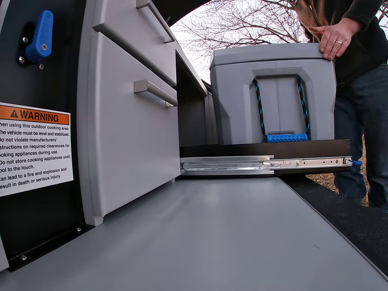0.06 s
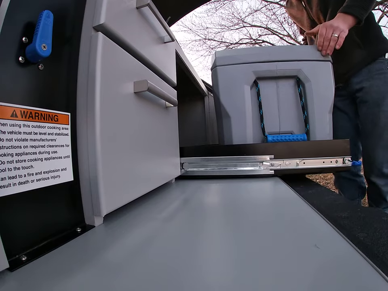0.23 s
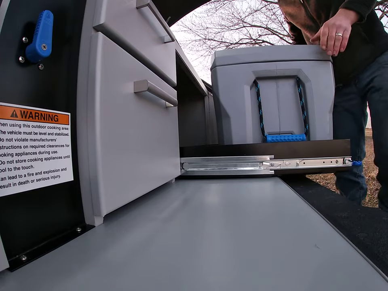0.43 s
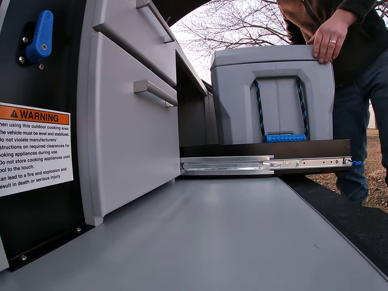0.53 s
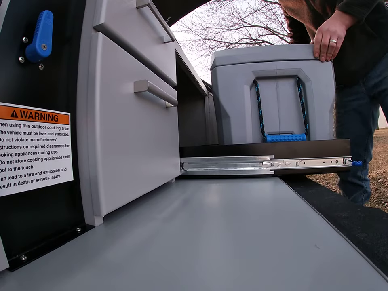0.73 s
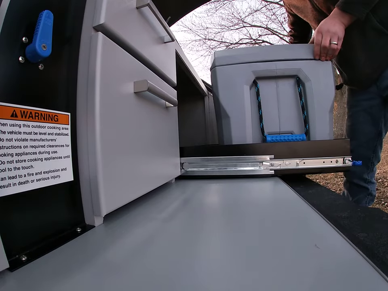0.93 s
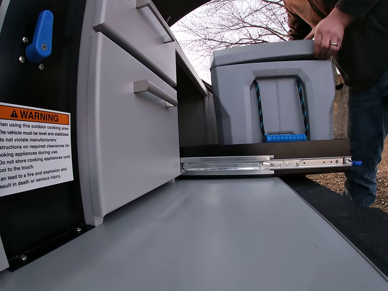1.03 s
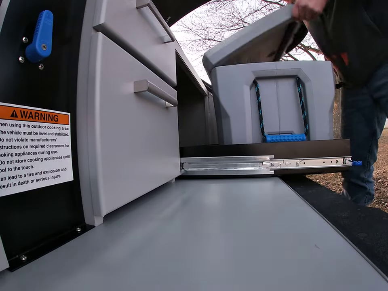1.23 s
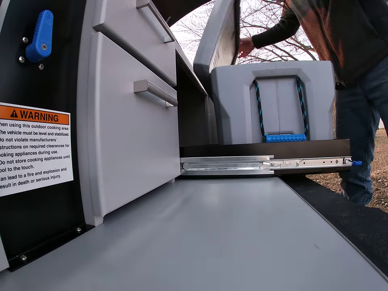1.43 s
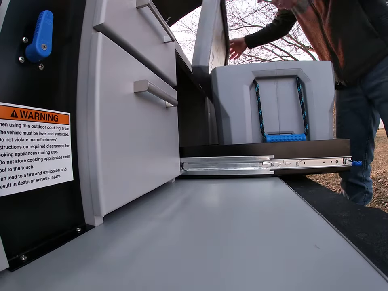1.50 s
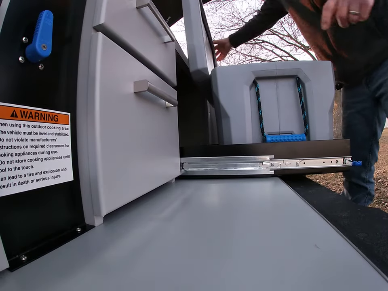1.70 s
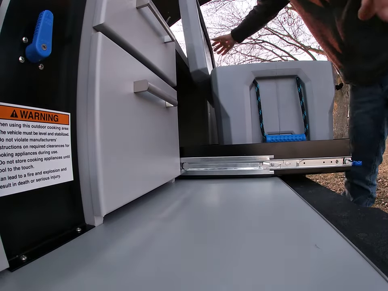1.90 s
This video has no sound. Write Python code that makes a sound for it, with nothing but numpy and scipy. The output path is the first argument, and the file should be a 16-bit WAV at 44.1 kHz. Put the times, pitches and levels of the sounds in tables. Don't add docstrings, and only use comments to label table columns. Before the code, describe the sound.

A plastic cool box is unlatched with a quick rubbery snap and a burst of loud hollow knocks, then lighter bumps as its lid lifts, over faint low breeze hum outdoors, heard close from the trailer body.

```python
import sys
import numpy as np
from scipy import signal
from scipy.fft import rfft, irfft, next_fast_len
from scipy.io import wavfile
from scipy.ndimage import uniform_filter1d, map_coordinates

SR = 44100
rng = np.random.default_rng(int(sys.argv[2]) if len(sys.argv) > 2 else 0)


def field_ratio(decibels):
    return 10 ** (np.asarray(decibels, dtype=float) / 20)


def generate_wav(signal):
    frames = np.transpose(np.atleast_2d(signal))
    scaled = np.clip(frames, -1, 1) * 32767
    pcm = np.round(scaled).astype(np.int16)
    wavfile.write(sys.argv[1], SR, pcm)


N = 85995
T = np.arange(N) / SR

# t/s, level/dB
BREEZE_LEVEL = [(0, 0.5), (.1, -2.5), (.2, 3.5), (.7, 0.5), (.8, -2.5), (.86, 6), (1.4, 0), (1.6, -0.5),
                (1.75, -1), (1.85, 0.5), (1.95, 0.5)]
# f/Hz, density/dB per Hz
HUM_SPECTRUM = [(15, -17), (25, 8.5), (226, -2.5), (384, -15.5), (534, -15), (575, -12.5), (800, -14.5),
                (2000, -38.5), (2600, -90), (4400, -120)]
# f/Hz, width/Hz, level/dB
HUM_RESONANCES = [(55, 38, 2), (203.7, 11, 11.5), (535, 9.4, 13.5)]
# f/Hz, density/dB per Hz
AIR_SPECTRUM = [(880, -44), (1500, -5), (3000, -2), (5270, -4), (8500, -3.5), (9200, -20), (12000, -22.5),
                (13500, -43)]
# t/s, level/dB, panel mode f/Hz, t60/s
SHOVE_EVENTS = [(.125, -30, 60.4, 0.13), (0.227, -21.5, 185, 0.27), (.23, -19.5, 60.9, 0.66),
                (.235, -22, 153.6, .3), (.24, -30, 286, 0.18), (0.301, -16, 181, 0.75),
                (0.321, -8, 68.2, 0.24), (.365, -7.5, 187.4, 0.26), (.405, -12, 165.1, 0.43),
                (0.421, -14.5, 111.7, 0.45), (.46, -16.5, 57.7, 0.57), (.52, -13.5, 182.6, 0.19),
                (0.581, -23, 162.5, 0.17), (0.621, -18, 169.7, 0.097), (0.659, -26.5, 170.7, 0.27),
                (0.719, -26.5, 78.6, 0.15), (0.834, -25.5, 170.6, 0.094), (0.909, -15.5, 178, 0.17),
                (.9146, -21, 180.7, 0.32), (.92, -16, 55, 0.38), (.935, -24, 168, 0.17),
                (.93, -35, 269, 0.16), (.982, -26.5, 157.6, 0.24), (.95, -23, 161.3, 0.6),
                (.97, -16, 79, 0.14), (1.112, -10, 46, 0.094), (1.195, -13, 181.4, 0.14),
                (1.2005, -16.5, 178, 0.14), (1.22, -18.5, 60.7, 0.15), (1.228, -29, 266, 0.12),
                (1.244, -21, 205, 0.14), (1.277, -17.5, 74.5, 0.17), (1.33, -31.5, 190.5, 0.81)]
# peak t/s, rise/s, fall/s, level/dB, brightness/dB per octave
RUSTLE_EVENTS = [(0.13, 0.016, 0.033, -52.5, -1), (0.2, 0.03, 0.16, -48.5, -5.5),
                 (0.81, 0.062, 0.049, -52.5, -5), (1.124, 0.028, 0.027, -42, -7.5),
                 (1.177, 0.015, 0.024, -53.5, 2), (1.119, .005, 0.0067, -58.5, 8),
                 (1.245, 0.01, .02, -54, -1.5), (1.282, 0.025, 0.04, -56.5, -1), (1.54, .02, 0.02, -59, -3),
                 (1.4, 0.016, 0.026, -56.5, -6), (1.1, 0.0089, .015, -54.5, -0.5),
                 (1.473, 0.028, 0.049, -51.5, -1.5), (1.95, 0.079, .05, -56, -3),
                 (0.784, 0.0078, 0.015, -52.5, -1.5), (0.654, 0.041, 0.037, -64.5, -3)]
# f/Hz, density/dB per Hz
CLOTH_SPECTRUM = [(500, -28.5), (1200, -9.5), (2200, -12), (3300, -9), (4860, -8), (8500, -10),
                  (12000, -25), (15400, -42)]
# t/s, level/dB, brightness/dB per octave, ring time factor, contact/s
KNOCK_EVENTS = [(0.227, -40.5, 6, 0.46, 0.0082), (0.254, -33.5, 4, 1, 0.013), (0.265, -24, -2, 0.92, 0.059),
                (.307, -23, 2.5, 0.47, 0.0032), (0.3133, -16.5, 0, 1, .005),
                (0.346, -27, 2.5, 0.71, 0.0073), (.3914, -26.5, 0, .2, .002),
                (0.3925, -17.5, -2, 0.74, 0.01), (.44, -24, -4, 0.66, 0.018),
                (0.61, -53.5, -1.5, 0.84, .004), (0.646, -51.5, 6, 0.2, 0.0078),
                (0.7043, -46.5, -3, 1, 0.0065), (.873, -57, 4, .15, .002), (.891, -28, -3, 1, 0.006),
                (0.908, -22.5, -7, 0.92, 0.0021), (.946, -30.5, -1, 0.93, 0.0046),
                (.965, -33.5, -4, 0.99, 0.024), (1.11, -42, -2, .5, 0.018), (1.149, -38.5, 2, 1, 0.021),
                (1.182, -31.5, -5.5, 0.49, 0.021), (1.234, -31.5, -5.5, 0.58, 0.006),
                (1.26, -37, -4, 0.71, 0.0071), (1.295, -42, -4, 0.89, 0.025),
                (1.3511, -39.5, -2.5, 0.27, 0.017), (1.605, -60, 6, 0.12, 0.0046),
                (1.612, -51.5, -6.5, 0.92, 0.0039), (1.912, -38.5, -6, 0.95, .04)]
# f/Hz, density/dB per Hz
BLOW_SPECTRUM = [(150, -0.5), (250, -7.5), (353, -17), (1050, -16.5), (2310, -20.5), (3560, -24),
                 (8560, -41), (13500, -62), (15400, -100)]
# f/Hz, width/Hz, level/dB
PANEL_RESONANCES = [(415, 10.7, 15.5), (535, 109, 11.5), (618, 41, 12.5), (797, 32, 9.5), (1050, 98, 7),
                    (1430, 11.5, 11), (2086, 74, 1.5), (3550, 290, -20.5), (6300, 1100, 1)]
# f/Hz, t60/s
PANEL_T60 = [(250, 0.6), (700, 0.34), (1840, 0.21), (4850, 0.21), (12000, 0.22)]
# t/s, level/dB, part's mode f/Hz, t60/s
CLACK_EVENTS = [(.227, -37, 2320, .05), (.228, -29.5, 397, 0.38), (.258, -25, 535, 0.4),
                (.2605, -18, 1498, 0.063), (.297, -14, 543.6, 0.11), (.307, -26, 3830, 0.059),
                (.309, -14.5, 1052, 0.23), (.3126, -18.5, 1202, .09), (.3126, -19, 2770, 0.062),
                (.312, -16, 3494, 0.058), (.312, -20, 3970, .04), (.326, -27, 3550, 0.12),
                (.313, -19, 6300, 0.025), (.315, -17.5, 395.5, 0.48), (.312, -19.5, 1430, 0.097),
                (.3914, -24, 2920, .03), (.392, -30.5, 2090, 0.092), (.393, -25, 1042, 0.1),
                (.393, -22, 539, .2), (.395, -26, 652, 0.15), (.405, -26, 803, 0.13),
                (.443, -22, 387, 0.21), (.447, -37, 1428, 0.23), (.8912, -38.5, 2910, 0.012),
                (.892, -30.5, 983, 0.097), (.892, -37, 1660, 0.12), (.893, -41, 2067, 0.08),
                (.893, -20, 451, 0.063), (.908, -25, 640, .06), (.946, -39.5, 3837, 0.038),
                (.946, -38.5, 3130, 0.043), (.947, -31.5, 650, 0.1), (.947, -41.5, 1010, 0.24),
                (.948, -39, 2019, 0.13), (1.12, -37.5, 1132, 0.05), (1.15, -33.5, 603, .3),
                (1.18, -38, 1488, 0.089), (1.19, -41, 580, 0.099), (1.2344, -40, 1530, 0.085),
                (1.25, -35.5, 592, 0.12), (1.265, -39, 1050, 0.12), (1.305, -38, 1050, 0.12),
                (1.3515, -43.5, 2375, 0.07), (1.352, -49, 2980, 0.031), (1.353, -52, 1650, 0.13),
                (1.355, -35.5, 603, 0.099), (1.608, -30, 607, 0.03), (1.615, -43.5, 1050, 0.11)]


def unit(x):
    return x / np.sqrt(np.mean(x ** 2) + 1e-20)


def along(points, hz):
    f, v = np.transpose(points)
    return np.interp(np.log(hz + 1), np.log(f + 1), v)


def peaks(modes, hz):
    power = 1
    for centre_hz, width_hz, db in modes:
        power = power + field_ratio(db) ** 2 / (1 + (2 * (hz - centre_hz) / width_hz) ** 2)
    return np.sqrt(power)


def wobble(rate_hz):
    knots = rng.standard_normal(int(N * rate_hz / SR) + 4)
    return map_coordinates(knots, [T * rate_hz])


def coloured(x, gain):
    m = next_fast_len(len(x) + 8192)
    hz = np.fft.rfftfreq(m, 1 / SR)
    return irfft(rfft(x, m) * gain(hz), m)[:len(x)]


def patchy(patchy_db):
    z = signal.stft(rng.standard_normal(N), nperseg=256)[2]
    field = uniform_filter1d(rng.standard_normal(z.shape), size=4, axis=0)
    field = uniform_filter1d(field, size=6, axis=1)
    return signal.istft(z * field_ratio(patchy_db * unit(field)), nperseg=256)[1][:N]


def rings(rows, rise_cycles, waver_rad):
    s, db, hz, t60_s = np.transpose(rows)[:, :, None]
    t = np.maximum(T - s, 0)
    drift = waver_rad * np.array([wobble(row[2] / 7) for row in rows])
    rise = (1 - np.exp(-t * hz / rise_cycles)) ** 2
    return (field_ratio(db - 60 * t / t60_s) * rise * np.sin(2 * np.pi * hz * t + drift)).sum(axis=0)


def body_hum():
    hum_db = -37.5
    level_db = hum_db + np.interp(T, *np.transpose(BREEZE_LEVEL)) + 0.45 * wobble(6.6)
    hum = coloured(patchy(patchy_db=2.0), lambda hz: field_ratio(along(HUM_SPECTRUM, hz)) * peaks(HUM_RESONANCES, hz))
    return unit(hum) * field_ratio(level_db)


def air_hiss(near):
    air_db = -67.5
    duck_from_db, duck_ratio, duck_release_s = -36, .5, .09
    air = unit(coloured(rng.standard_normal(N), lambda hz: field_ratio(along(AIR_SPECTRUM, hz))))
    k = np.exp(-1 / (duck_release_s * SR))
    loud_db = 10 * np.log10(signal.lfilter([1 - k], [1, -k], near ** 2) + 1e-12)
    duck_db = duck_ratio * np.maximum(loud_db - duck_from_db, 0)
    return air * field_ratio(air_db - duck_db)


def shoves():
    return rings(SHOVE_EVENTS, rise_cycles=0.4, waver_rad=0.49)


def sleeves():
    stroke_edge = 2.15
    out = np.zeros(N)
    for s, rise_s, fall_s, db, tilt_db in RUSTLE_EVENTS:
        grains = patchy(patchy_db=1.8) * field_ratio(0.83 * wobble(380))
        cloth = unit(coloured(
            grains, lambda hz: field_ratio(along(CLOTH_SPECTRUM, hz) + tilt_db * np.log2((hz + 50) / 4000))))
        side_s = np.where(T < s, rise_s, fall_s)
        stroke = np.exp(-.5 * np.abs((T - s) / side_s) ** stroke_edge)
        out += field_ratio(db) * stroke * cloth
    return out


def knock_gain(hz, tilt_db):
    floor_hz = 180
    dull_hz, dull_db_per_octave = 11500, 1.5
    corner_hz = dull_hz * 2 ** (tilt_db / dull_db_per_octave)
    db = along(BLOW_SPECTRUM, hz) + tilt_db * np.log2((hz + 50) / 1000)
    db = db + min(tilt_db, 0) * np.log2(1 + (hz / corner_hz) ** 4)
    low_cut = hz ** 4 / (hz ** 4 + floor_hz ** 4)
    return field_ratio(db) * peaks(PANEL_RESONANCES, hz) * low_cut


def knocks():
    crack_db, crack_t60_s, rise_s = 7, .007, 0.0003
    out, n = np.zeros(N + SR), SR // 2
    t = np.arange(n) / SR
    for s, db, tilt_db, ring, contact_s in KNOCK_EVENTS:
        noise = unit(coloured(rng.standard_normal(n), lambda hz: knock_gain(hz, tilt_db)))
        hz, u, z = signal.stft(noise, SR, nperseg=256, noverlap=224)
        t60_s = max(ring, .05) * along(PANEL_T60, hz)[:, None]
        fade_db = -60 * np.maximum(u - contact_s, 0) / t60_s
        body = signal.istft(z * field_ratio(fade_db), SR, nperseg=256, noverlap=224)[1][:n]
        rise = (1 - np.exp(-t / rise_s)) ** 2
        crack = 1 + field_ratio(crack_db + min(tilt_db, 0) - 60 * t / crack_t60_s)
        out[round(s * SR):][:n] += field_ratio(db) * body * rise * crack
    return out[:N]


def clacks():
    return rings(CLACK_EVENTS, rise_cycles=0.68, waver_rad=0.9)


def latch():
    start_s, length_s, rise_s, t60_s = .2545, .02, 0.0022, 0.15
    level_db, start_hz, fall_hz_per_s = -16.5, 2265, 56500
    t = np.clip(T - start_s, 0, length_s)
    turns = start_hz * t - .5 * fall_hz_per_s * t ** 2
    close = np.cos(np.pi * t / (2 * length_s)) ** 2
    shape = (1 - np.exp(-t / rise_s)) ** 2 * close * field_ratio(level_db - 60 * t / t60_s)
    rough = np.zeros(N)
    for k in (1, .78):
        rough += k * field_ratio(1.5 * wobble(600)) * np.sin(2 * np.pi * k * turns + .3 * wobble(500))
    return shape * rough


def scene():
    near = shoves() + knocks() + clacks() + latch()
    return (body_hum() + air_hiss(near) + sleeves() + near)[None]


def low_pass(x):
    return signal.sosfilt(signal.butter(12, 15540, fs=SR, output="sos"), x)


def record(dry):
    low_cut_hz, mic_top_hz = 37, 15200
    ceiling, knee = .8, 3
    x = signal.lfilter(*signal.butter(2, low_cut_hz, "high", fs=SR), dry)
    x = x / (1 + np.abs(x / ceiling) ** knee) ** (1 / knee)
    x = signal.lfilter(*signal.butter(6, mic_top_hz, fs=SR), x)
    return low_pass(x)


dry = scene()
out = record(dry)
generate_wav(out)
```